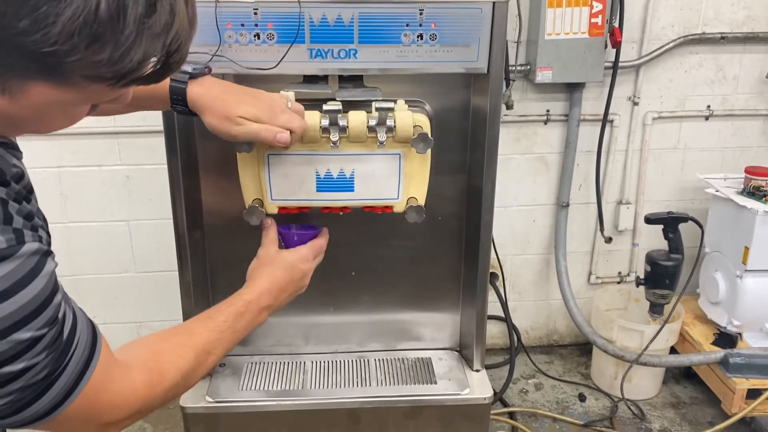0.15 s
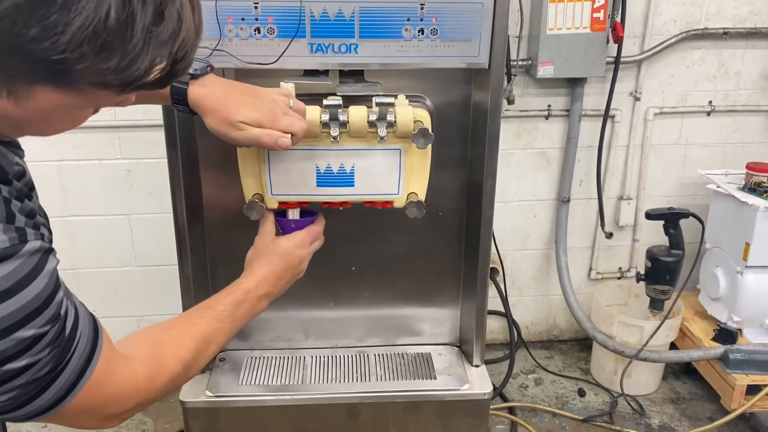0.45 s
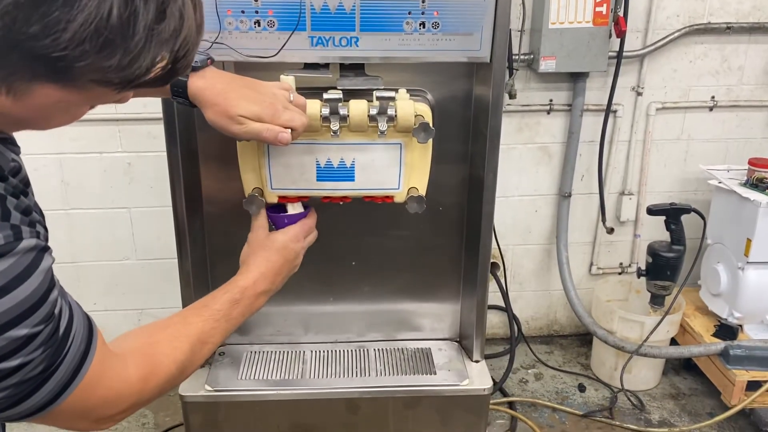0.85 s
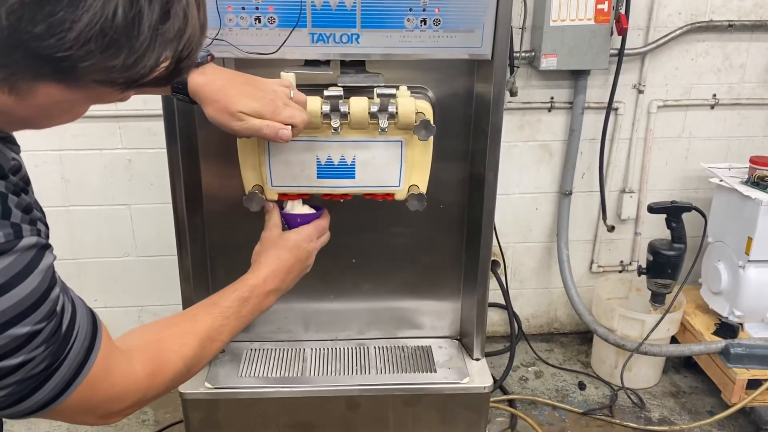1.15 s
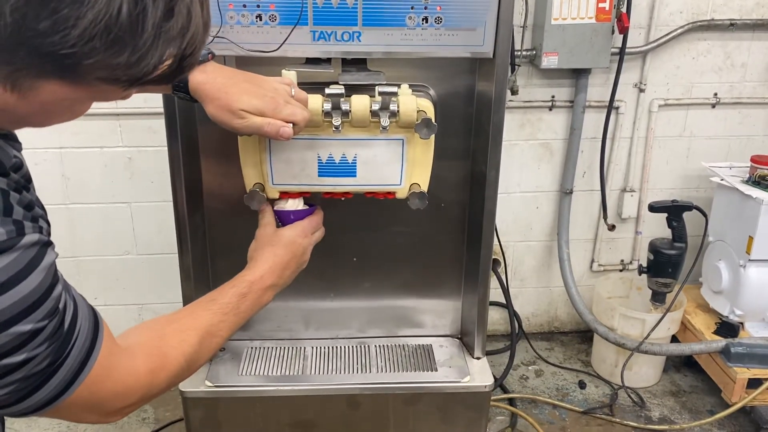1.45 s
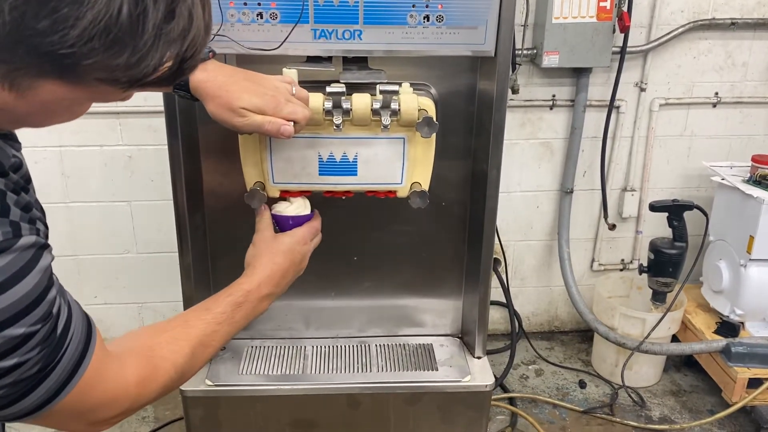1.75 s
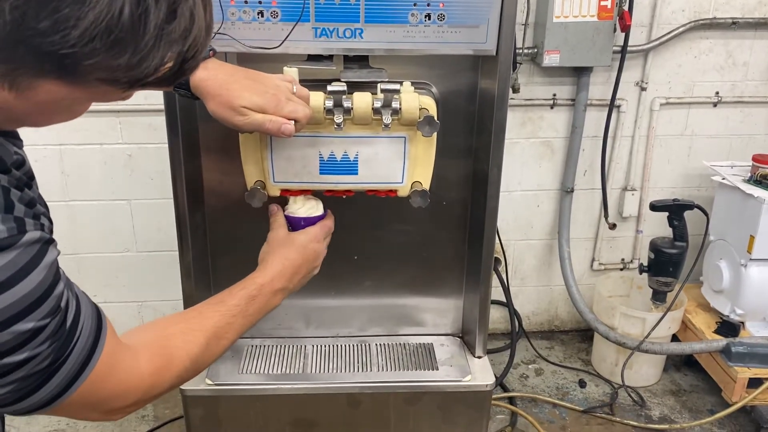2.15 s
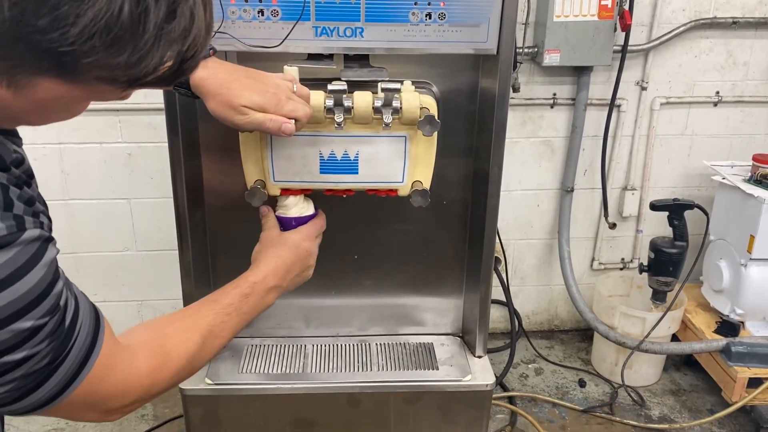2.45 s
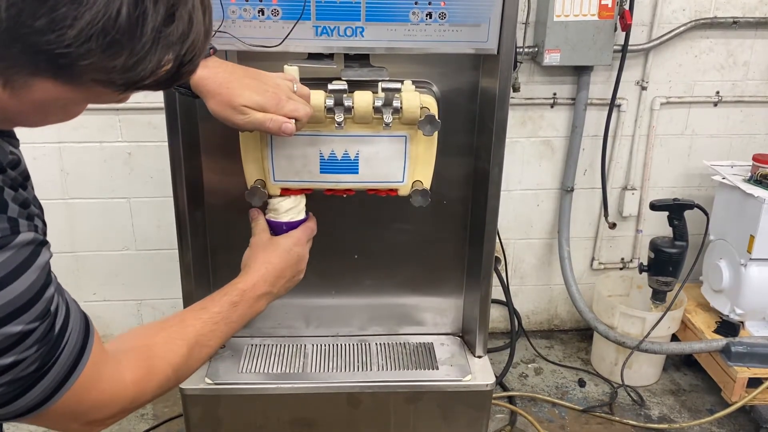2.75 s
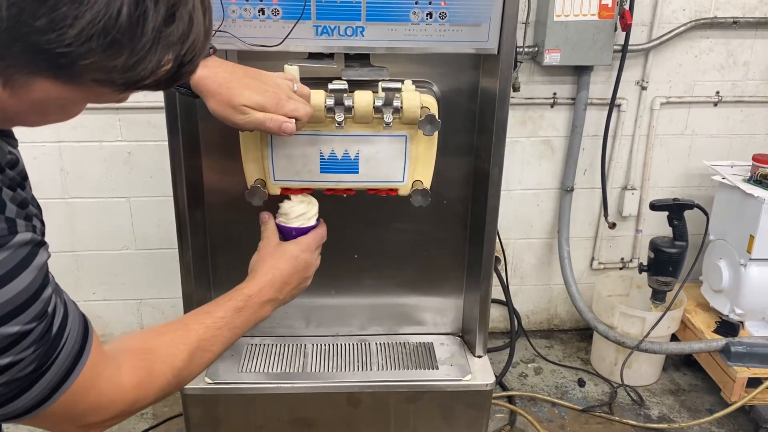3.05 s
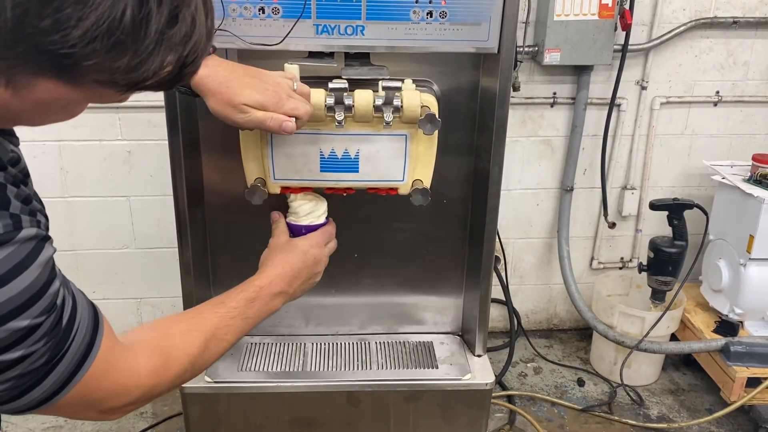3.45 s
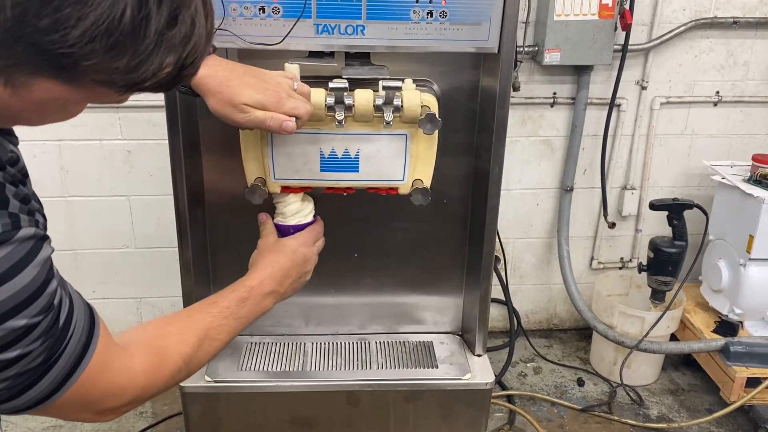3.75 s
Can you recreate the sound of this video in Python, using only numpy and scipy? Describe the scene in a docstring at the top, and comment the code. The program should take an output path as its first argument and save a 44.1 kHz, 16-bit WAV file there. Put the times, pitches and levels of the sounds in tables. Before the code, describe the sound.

A soft-serve machine's lever clacks and its steel cabinet thuds at the start, then the motor buzzes steadily with rasp, fan rush and hiss, over low compressor rumble in a hard-walled workshop, heard fairly close.

```python
"""A compressor hums and rumbles in a hard-walled workshop; then a soft-serve machine starts over it.
The draw lever clacks (bursts of noise), the steel cabinet booms (decaying modes) and the drive scuffs.
The motor buzzes in harmonics of its shaft rate; one panel resonance shifts as the load settles.
Bright rasp, sizzle and a few thin whistles come and go; the fan rushes and a fine hiss runs on."""
import sys
import numpy as np
from scipy import signal
from scipy.fft import rfft, irfft, next_fast_len
from scipy.io import wavfile
from scipy.ndimage import map_coordinates

SR = 44100
rng = np.random.default_rng(int(sys.argv[2]) if len(sys.argv) > 2 else 0)


def unload_wav(signal):
    """Save mono or channel-first audio to the path in sys.argv[1] as 16-bit WAV at rate SR, clipped to [-1, 1]."""
    wavfile.write(
        sys.argv[1],
        SR,
        np.round(np.clip(np.atleast_2d(signal).T, -1, 1) * 32767).astype(np.int16),
    )


N = 171990

# In every spectrum below the level is a relative density per hertz.
# Stereo width of noise and partials: f/Hz, side minus mid level/dB
SIDE_WIDTH = [(130, -19), (290, -12), (700, -2), (2000, -5), (7000, -1.5)]

# Compressor tones: f/Hz, rms level/dB
COMPRESSOR_TONES = [(76.7, -49), (119.8, -51)]
# Compressor rumble spectrum: f/Hz, level/dB
RUMBLE_SPECTRUM = [(25, -35), (45, -14), (100, -6.5), (128, 5.5), (150, 4.5), (175, -19.5), (210, -4),
                   (265, -7.5), (400, -39.5)]
RUMBLE_DB, CHURN_DEPTH_DB, CHURN_HZ = -36.5, -0.5, 2.484
# Background spectrum of the workshop: f/Hz, level/dB
ROOM_SPECTRUM = [(25, -23), (60, -1), (400, -10), (1500, -11), (15000, -52)]
ROOM_TONE_DB = -41.5

# Onset of the motor's sounds: start and time constant
START_S, RUN_UP_S = 0.033, 0.064
# Shaft speed: t/s, f/Hz (turns per second)
SHAFT_SPEED = [(0.3, 58.14), (0.6, 58.17), (1, 58.24), (1.4, 58.29), (1.9, 58.33), (2.5, 58.36),
               (3.1, 58.39), (3.7, 58.39)]
SHAFT_JITTER_RAD = 0.00086

# Fan noise spectrum: f/Hz, level/dB
FAN_SPECTRUM = [(100, -21), (300, 0), (420, 5), (620, -4.5), (900, 2), (1250, -3), (1600, -5), (2300, -3.5),
                (3500, -12.5), (6500, -16.5), (11000, -51)]
FAN_DB, FAN_PULSE, FAN_FLUTTER_DB = -38, 0.1, 2
# Hiss spectrum, cut off below its first row: f/Hz, level/dB
HISS_SPECTRUM = [(5000, -10), (7000, 0), (9700, -1.5), (11500, -4), (13000, -8), (15200, -2.5)]
HISS_DB, HISS_LEAD_S = -45.5, 0.000294  # level; time by which the left channel leads

# Shaft harmonics: order, relative level/dB
HARMONICS = [(1, -45.5), (2, -42), (3, -52), (4, -43.5), (6, -54.5), (10, -52), (13, -47), (15, -32.5),
             (16, -34), (17, -37.5), (18, -51.5), (19, -44), (20, -53), (23, -53), (25, -44.5), (26, -44),
             (28, -48.5), (31, -49), (32, -51), (34, -49.5), (35, -40), (36, -50.5), (39, -53), (41, -49),
             (45, -49), (46, -51), (47, -42.5), (48, -56.5), (49, -55), (50, -53), (53, -52)]
# Phase wander of a partial, and the frequency scale of its growing blur
WANDER_RAD, BLUR_HZ = 0.16, 15000
BUZZ_AHEAD_TURNS, BUZZ_SPREAD_RAD = 0.2, 0.75  # lead over the panel's ring; random phase spread

# The loudest panel: t/s, level/dB before PANEL_TRIM_DB, resonance f/Hz
PANEL_RESONANCE = [(0.3, -34.5, 968), (0.65, -38, 962), (0.9, -34, 974), (1.25, -30, 952), (1.8, -31, 954),
                   (2.5, -29.5, 907), (2.8, -31.5, 918), (3.3, -30.5, 868), (3.8, -29, 810)]
# Band whose harmonics sound through that panel: lowest f/Hz, highest f/Hz
PANEL_LIMITS = (840, 1140)
PANEL_TRIM_DB, PANEL_WIDTH_HZ = -0.5, 97
PANEL_SIDE_DB, PANEL_SIDE_RAD = -7, 1.71  # side signal relative to mid
SETTLE_S, UNSETTLED_RAD = 0.95, 0.9  # partials out of step until SETTLE_S, then locked

BUZZ_DB, LEVEL_WAVER_DB = -33.5, 3  # level of the strongest order; waver before each use scales it
# Four further ring bands, in the order of the curves below: lowest f/Hz, highest f/Hz
RING_LIMITS = [(742, 772), (1430, 1540), (2015, 2070), (2650, 2890)]
# Lowest ring, strong just after the start: t/s, relative level/dB
BODY_SWELL = [(0.14, -52), (0.24, -44), (0.45, -47.5), (0.66, -58)]
# Second ring: t/s, relative level/dB
LOW_SWELL = [(0.3, -37), (0.9, -34.5), (1.15, -39.5), (2.1, -40.5), (3, -45.5), (3.8, -40)]
# Third ring: t/s, relative level/dB
MID_SWELL = [(0.3, -47.5), (1, -43), (1.8, -46), (2.2, -42), (2.8, -38.5), (3.3, -41), (3.8, -42.5)]
# Highest ring: t/s, relative level/dB
HIGH_SWELL = [(0.3, -50), (0.98, -50.5), (1.13, -40), (2.5, -38.5), (2.78, -45), (3.2, -45), (3.65, -42.5)]

# Mean level of each line of the sizzle: f/Hz, level/dB
SIZZLE_LINES = [(3400, -66), (4100, -64.5), (4750, -62.5), (5400, -69.5), (6500, -68), (8400, -79),
                (9600, -67.5), (11000, -76)]
# Swell of sizzle and chatter: t/s, relative level/dB
SIZZLE_SWELL = [(0.3, -43.5), (0.95, -41), (2.58, -42.5), (2.8, -45), (3.6, -42.5)]
SIZZLE_SCATTER_DB, SIZZLE_WAVER_DB = 3.5, 4.5
# Sheet-metal chatter spectrum: f/Hz, level/dB
CHATTER_SPECTRUM = [(1200, -38), (2000, 2), (2800, 2), (3500, -2), (5500, -12), (8000, -67)]
CHATTER_DB, CHATTER_PULSE = -47, 0.38
# Rasp: t/s, level/dB
RASP_CURVE = [(0.3, -46), (1.06, -44.5), (1.85, -53), (2.58, -45.5), (2.8, -55), (3.6, -51)]
# Rasp spectrum: f/Hz, level/dB
RASP_SPECTRUM = [(3000, -35), (3950, -9), (4750, 2.5), (5300, -5.5), (6500, -16), (8500, -46)]
RASP_PULSE, RASP_ROUGH_DB = 0.16, 3

# Scuff of the drive, before its rattle: t/s, level/dB
SCUFF_CURVE = [(.05, -67), (.075, -28), (.12, -28.5), (.165, -24), (.28, -38.5), (.42, -48), (.6, -76)]
# Scuff spectrum: f/Hz, level/dB
SCUFF_SPECTRUM = [(150, 0), (300, 10.5), (800, 3.5), (3000, -6.5), (10500, -7), (15000, -31)]
SCUFF_RATTLE_DB = 3.2

# Metal contacts of lever and switch, before their rise: t/s, level/dB, t60/s
CONTACTS = [(0.0555, -22.5, 0.092), (0.065, -15.5, 0.07), (0.0686, -15.5, 0.073), (0.079, -33, 0.051),
            (.124, -31, .04), (.155, -25, 0.055), (.186, -30, .045), (.212, -29, 0.047)]
# Contact spectrum: f/Hz, level/dB
CONTACT_SPECTRUM = [(150, -27), (400, -3), (800, 0), (1100, -11), (1500, 1.5), (4000, -5), (15000, -12.5)]
CONTACT_RISE_S = 0.0013

# Jolts of the cabinet as the motor takes up: t/s, level/dB, frequency ratio
CABINET_JOLTS = [(0.0704, -9, .98), (0.108, -16.5, 1.0), (0.1238, -23.5, .99), (.183, -20, 1.08),
                 (.224, -26, .89)]
# Cabinet modes: f/Hz at ratio 1, level/dB relative to the jolt, t60/s
CABINET_MODES = [(265.4, 6, 0.125), (250.7, -7.5, 0.156), (525.2, -7, .14), (736, -3, 0.044),
                 (813, -8.5, 0.13), (1230, -15, 0.17), (1486, -1.5, 0.039)]
JOLT_RISE_S, JOLT_SIDE_DB = 0.0052, -30

# Reverberation of the workshop: f/Hz, t60/s
REVERB_TIME = [(200, 0.31), (2000, 0.38), (12000, 0.28)]
CLACK_ECHO_DB, BOOM_ECHO_DB = -3.5, -11

# Whistles: order of the shaft rate, from t/s, to t/s, level/dB before the waver
WHISTLE_LINES = [(80, .3, 1.4, -55), (69, 1.05, 2.65, -56.5), (64, 1.5, 2.5, -56), (74, 2.7, 4, -55),
                 (115, 2.8, 4, -59)]

CEILING, TOP_HZ = 0.93, 15600  # limit of the rounded peaks; upper band limit


def amp(db):
    """Level in decibels as an amplitude ratio."""
    return 10 ** (np.asarray(db) / 20)


def unit(x):
    """Normalisation to rms 1."""
    return x / np.sqrt(np.mean(x ** 2) + 1e-20)


def along(points, hz):
    """Interpolation of a table on a logarithmic frequency axis."""
    f, v = np.transpose(points)
    return np.interp(np.log(hz + 1), np.log(f + 1), v)


def clock():
    """Time of each sample in seconds."""
    return np.arange(N) / SR


def curves(rows):
    """Linear interpolation in time of each column after the first."""
    s, *cols = np.transpose(rows)
    return [np.interp(clock(), s, c) for c in cols]


def swell(rows):
    """Amplitude envelope of rms 1 from a level curve."""
    return unit(amp(curves(rows)[0]))


def wobble(rate):
    """Smooth random modulation: a spline through normal deviates, `rate` of them a second."""
    coarse = np.linspace(0, N / SR, 600)
    knots = rng.standard_normal(600)
    return np.interp(clock(), coarse, map_coordinates(knots, [coarse * rate], mode="wrap"))


def filtered(x, response):
    """Linear filtering as multiplication by a frequency response."""
    m = next_fast_len(N + SR // 2)
    return irfft(rfft(x, m) * response(np.fft.rfftfreq(m, 1 / SR)), m)[..., :N]


def stereo(mid, side):
    """Left and right as the sum and difference of mid and side."""
    return np.array([mid + side, mid - side])


def rush(spectrum):
    """Filtered noise of rms 1, its channels nearly alike in the bass and less so in the treble."""
    noise = rng.standard_normal((2, N))
    mid, side = filtered(noise, lambda hz: amp(along(spectrum, hz)))
    return unit(stereo(mid, filtered(side, lambda hz: amp(along(SIDE_WIDTH, hz)))))


def compressor():
    """Additive synthesis of low tones with wandering phase, over amplitude-modulated rumble."""
    t = clock()
    hum = np.zeros(N)
    for hz, db in COMPRESSOR_TONES:
        phase = 2 * np.pi * (hz * t + rng.random()) + 0.6 * wobble(2.6)
        hum += amp(db) * np.sqrt(2) * np.sin(phase)
    churn_db = CHURN_DEPTH_DB * np.sin(2 * np.pi * CHURN_HZ * t)
    return hum + amp(RUMBLE_DB + churn_db) * rush(RUMBLE_SPECTRUM)


def room_tone():
    """Stationary background noise of the workshop."""
    return amp(ROOM_TONE_DB) * rush(ROOM_SPECTRUM)


def running():
    """Exponential approach of the motor's amplitude to 1 from the start."""
    return 1 - np.exp(-np.maximum(clock() - START_S, 0) / RUN_UP_S)


def turn_pulse(angle, depth):
    """Amplitude modulation once a turn, ahead of the panel's ring."""
    return 1 + depth * np.cos(angle + 2 * np.pi * BUZZ_AHEAD_TURNS)


def fan(angle):
    """Broadband air noise, fluttering and weakly amplitude-modulated at the shaft rate."""
    flutter = amp(FAN_DB + FAN_FLUTTER_DB * wobble(12))
    return flutter * (1 + FAN_PULSE * np.cos(angle)) * rush(FAN_SPECTRUM)


def hiss():
    """Interaural time difference: one noise source, the left channel leading."""
    lead = np.array([[1], [-1]]) * HISS_LEAD_S / 2

    def response(hz):
        passband = hz > HISS_SPECTRUM[0][0]
        return amp(along(HISS_SPECTRUM, hz)) * passband * np.exp(2j * np.pi * hz * lead)

    return amp(HISS_DB) * unit(filtered(rng.standard_normal(N), response))


def partial(angle, order, hz):
    """Phase-modulated shaft harmonic, less steady the higher it is; side in quadrature with mid."""
    drift = WANDER_RAD * wobble(2.91) + (hz / BLUR_HZ) ** 2 * wobble(16)
    offset = BUZZ_SPREAD_RAD * rng.standard_normal()
    phase = order * (angle + 2 * np.pi * BUZZ_AHEAD_TURNS) + offset + drift
    phase = (phase % (2 * np.pi)).astype(np.float32)
    apart = float(rng.choice([-1, 1]) * np.pi / 2)
    side = float(amp(along(SIDE_WIDTH, hz))) * np.cos(phase + apart)
    return np.sqrt(2) * stereo(np.cos(phase), side)


def panel(angle, speed):
    """Forced resonance: a mostly sinking Gaussian peak weights the shaft harmonics in its band."""
    level_db, centre = curves(PANEL_RESONANCE)
    low, high = PANEL_LIMITS
    lines = [(k, db) for k, db in HARMONICS if low < k * speed < high]
    mean = centre.mean()
    shift = (centre - mean) / PANEL_WIDTH_HZ ** 2
    gains = np.array([amp(db) * np.exp((k * speed - mean) * shift) for k, db in lines])
    # A phase quadratic in order spreads each turn's pulse until it settles.
    smear = UNSETTLED_RAD * np.clip(1 - (clock() / SETTLE_S) ** 2, 0, 1)
    ring = np.zeros(N, complex)
    for gain, (k, db) in zip(gains, lines):
        ring += gain * np.exp(1j * (k * angle + smear * (k - mean / speed) ** 2))
    ring /= np.linalg.norm(gains, axis=0)
    side = amp(PANEL_SIDE_DB) * ring * np.exp(1j * PANEL_SIDE_RAD)
    return np.sqrt(2) * amp(level_db + PANEL_TRIM_DB) * stereo(ring.real, side.real)


def buzz(angle, speed):
    """Harmonic series of the shaft outside the panel band: four rings swell and fade, the rest waver."""
    out = np.zeros((2, N))
    swells = map(swell, (BODY_SWELL, LOW_SWELL, MID_SWELL, HIGH_SWELL))
    rings = list(zip(RING_LIMITS, swells))
    loudest_db = max(db for k, db in HARMONICS)
    for k, db in HARMONICS:
        hz = k * speed
        if PANEL_LIMITS[0] < hz < PANEL_LIMITS[1]:
            continue
        waver = unit(amp(LEVEL_WAVER_DB * (1.5 - 1 / k) * wobble(4.125)))
        gain = next((g for (low, high), g in rings if low < hz < high), waver)
        out += amp(BUZZ_DB + db - loudest_db) * gain * partial(angle, k, hz)
    return out


def sizzle(angle, speed, count=190):
    """High harmonics of chattering sheet metal, each of random phase and wavering amplitude."""
    out = np.zeros((2, N))
    for k in range(int(HARMONICS[-1][0]) + 1, count):
        hz = k * speed
        level_db = along(SIZZLE_LINES, hz) + SIZZLE_SCATTER_DB * rng.standard_normal()
        waver = unit(amp(SIZZLE_WAVER_DB * wobble(3.87)))
        turned = angle + rng.uniform(0, 2 * np.pi)
        out += amp(level_db) * waver * partial(turned, k, hz)
    return out * swell(SIZZLE_SWELL)


def chatter(angle):
    """Noise part of the sizzle, amplitude-modulated into a puff each turn."""
    puffs = turn_pulse(angle, CHATTER_PULSE)
    return amp(CHATTER_DB) * swell(SIZZLE_SWELL) * puffs * rush(CHATTER_SPECTRUM)


def rasp(angle):
    """Resonant noise of the loaded drive, modulated once a turn and roughened at random."""
    puffs = turn_pulse(angle, RASP_PULSE) * amp(RASP_ROUGH_DB * wobble(60))
    return amp(curves(RASP_CURVE)[0]) * unit(puffs * rush(RASP_SPECTRUM))


def scuff():
    """Friction noise of the drive as it runs up, with rapid random level modulation."""
    level_db = curves(SCUFF_CURVE)[0] + SCUFF_RATTLE_DB * wobble(123.0)
    return amp(level_db) * rush(SCUFF_SPECTRUM)


def lever():
    """Impact noise: each metal contact excites a burst that decays exponentially."""
    level = np.zeros(N)
    for s, db, t60 in CONTACTS:
        t = np.maximum(clock() - s, 0)
        level += amp(db - 60 * t / t60) * (1 - np.exp(-t / CONTACT_RISE_S))
    return level * rush(CONTACT_SPECTRUM)


def cabinet():
    """Modal synthesis: each jolt excites damped modes, retuned as the frame flexes."""
    out = np.zeros((2, N))
    for s, db, ratio in CABINET_JOLTS:
        t = np.maximum(clock() - s, 0)
        rise = 1 - np.exp(-t / JOLT_RISE_S)
        for hz, mode_db, t60 in CABINET_MODES:
            fade = amp(db + mode_db - 60 * t / t60) * rise
            phase = 2 * np.pi * hz * ratio * t
            out += fade * stereo(np.sin(phase), amp(JOLT_SIDE_DB) * np.cos(phase))
    return out


def workshop(x):
    """Reverberation of the block walls: convolution with noise decaying by frequency-dependent t60."""
    noise = rng.standard_normal((2, SR // 2))
    hz, t, bins = signal.stft(noise, SR, nperseg=256)
    decay = amp(-60 * t / along(REVERB_TIME, hz)[:, None])
    tail = signal.istft(bins * decay, SR, nperseg=256)[1]
    return signal.fftconvolve(x, tail / np.linalg.norm(tail[0]), axes=1)[:, :N]


def whistles(angle, speed):
    """Isolated high harmonics, each gated to its own interval and wavering in level."""
    out = np.zeros((2, N))
    for k, start, end, db in WHISTLE_LINES:
        gate = np.clip(np.minimum(clock() - start, end - clock()) / RUN_UP_S, 0, 1)
        out += amp(db + LEVEL_WAVER_DB * wobble(10)) * gate * partial(angle, k, k * speed)
    return out


def scene():
    """Superposition of compressor, background, motor, starting transients and their reverberation."""
    speed, = curves(SHAFT_SPEED)
    angle = 2 * np.pi * np.cumsum(speed) / SR + SHAFT_JITTER_RAD * wobble(25.4)
    turns = speed.mean()
    motor = fan(angle) + hiss() + panel(angle, turns) + buzz(angle, turns)
    motor += sizzle(angle, turns) + chatter(angle) + rasp(angle) + whistles(angle, turns)
    clack, boom = lever(), cabinet()
    echo = workshop(amp(CLACK_ECHO_DB) * clack + amp(BOOM_ECHO_DB) * boom)
    return compressor() + room_tone() + running() * motor + scuff() + clack + boom + echo


def record(dry):
    """Soft saturation of the loudest peaks, then an ideal low-pass filter."""
    rounded = dry / (1 + (dry / CEILING) ** 6) ** (1 / 6)
    return filtered(rounded, lambda hz: hz < TOP_HZ)


dry = scene()
out = record(dry)
unload_wav(out)
```